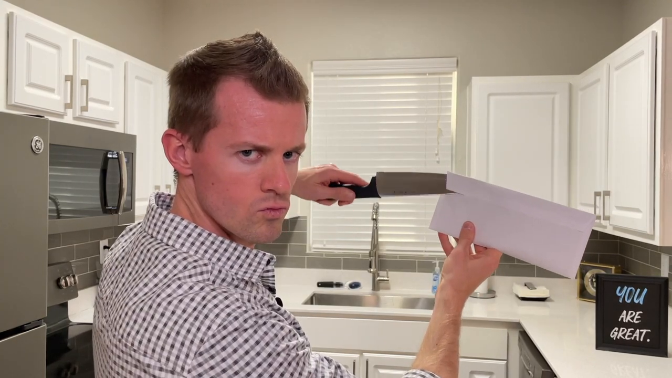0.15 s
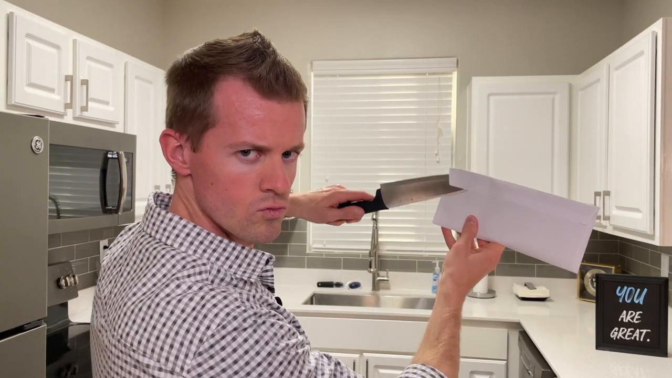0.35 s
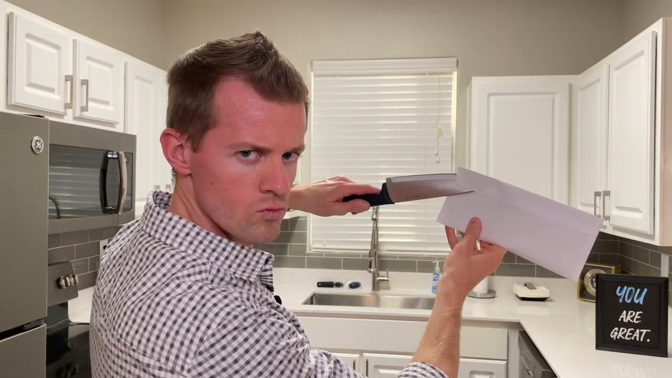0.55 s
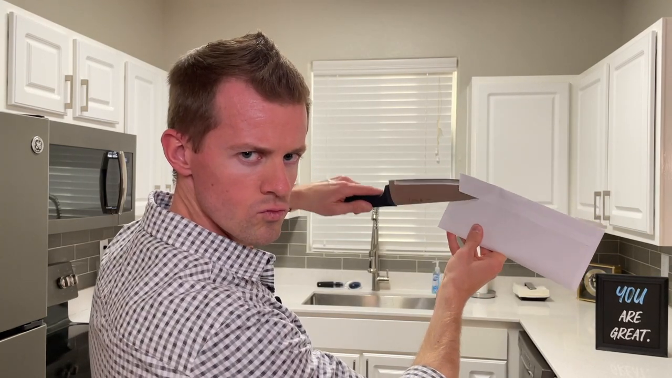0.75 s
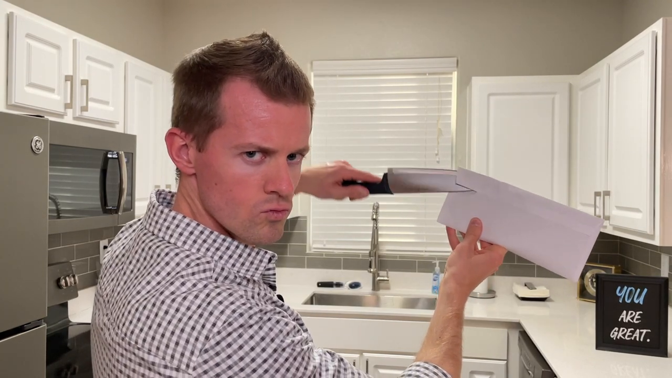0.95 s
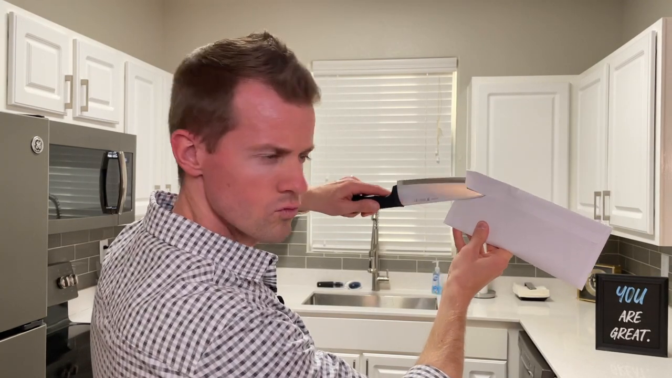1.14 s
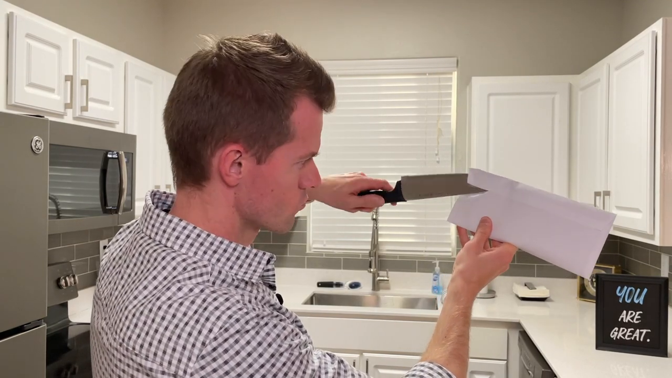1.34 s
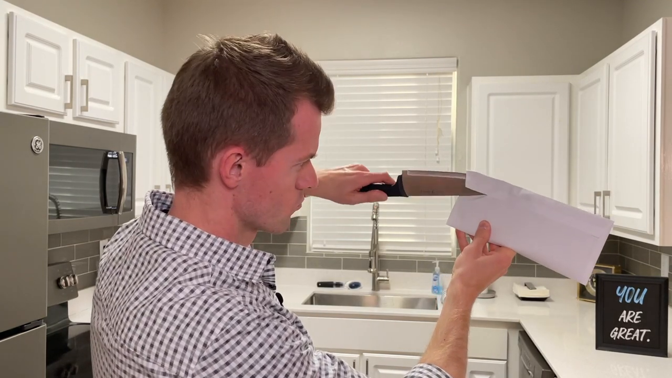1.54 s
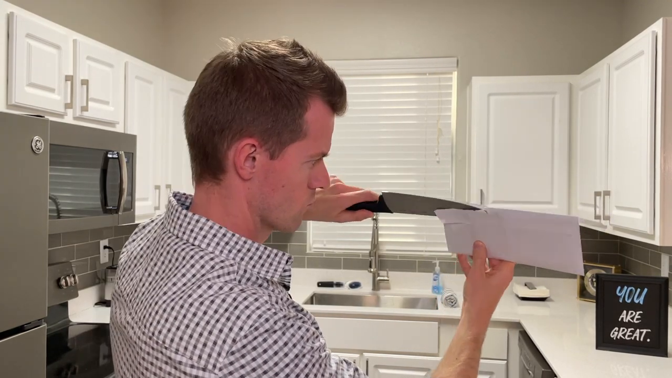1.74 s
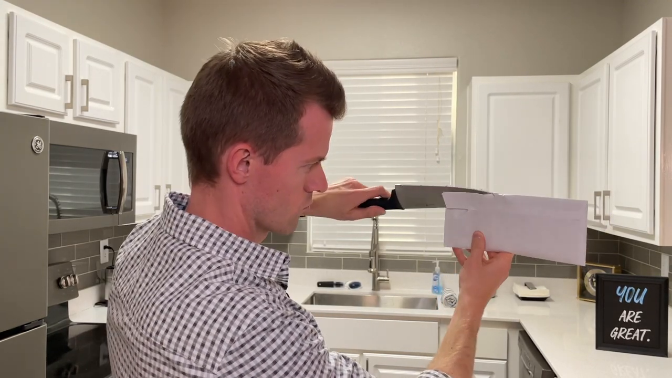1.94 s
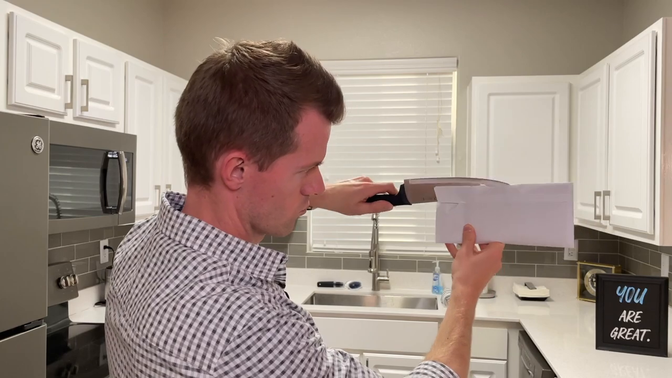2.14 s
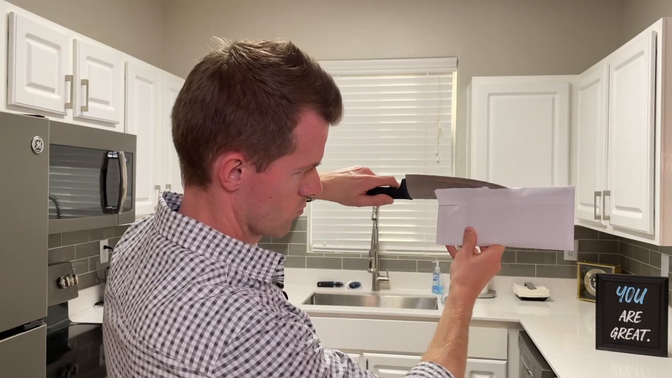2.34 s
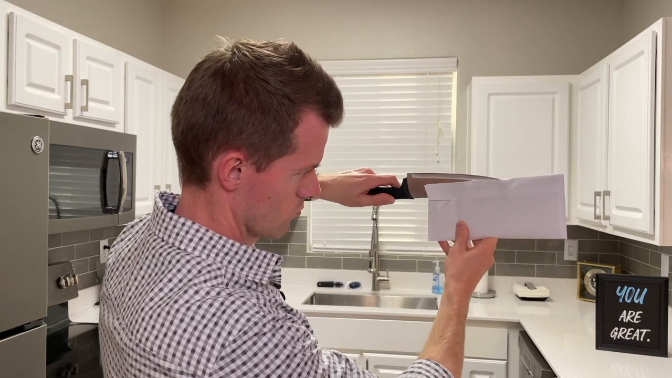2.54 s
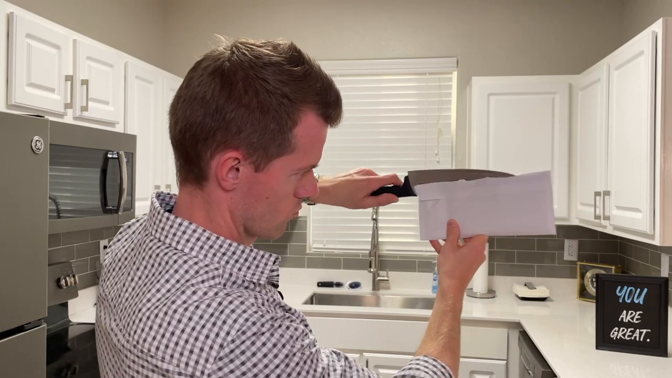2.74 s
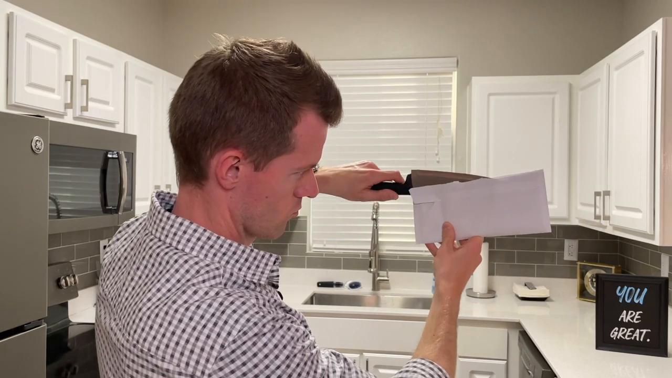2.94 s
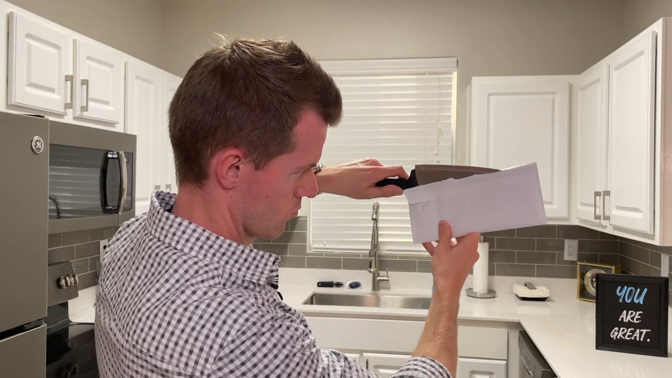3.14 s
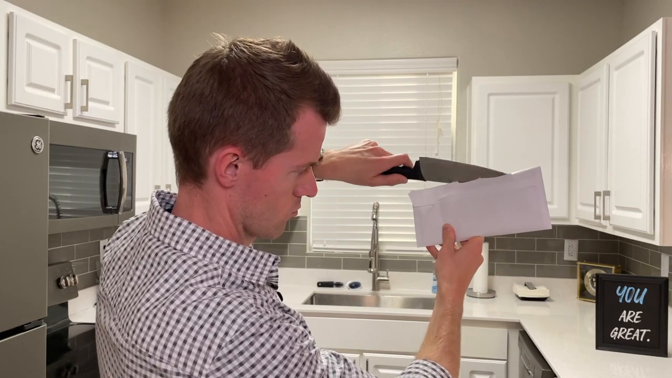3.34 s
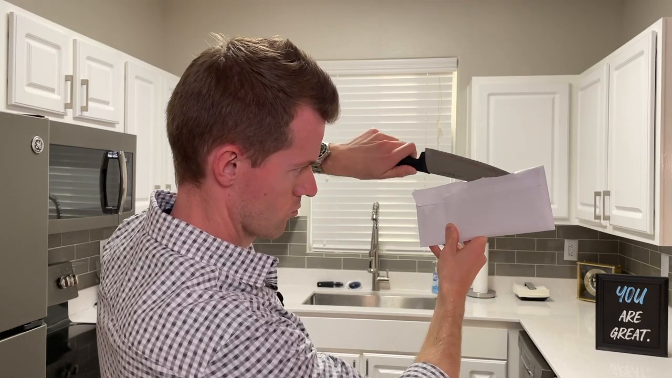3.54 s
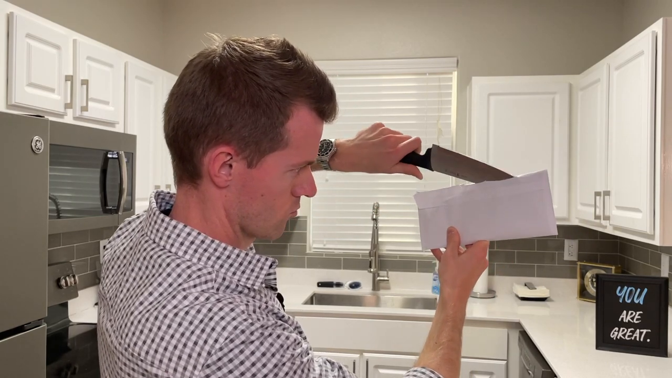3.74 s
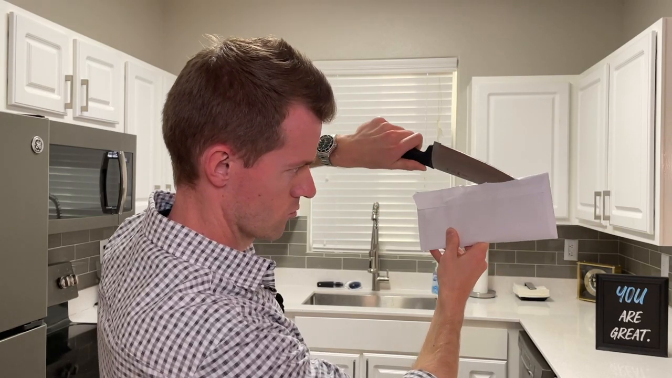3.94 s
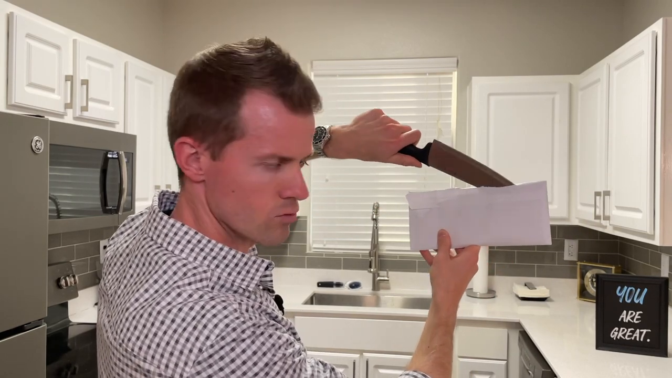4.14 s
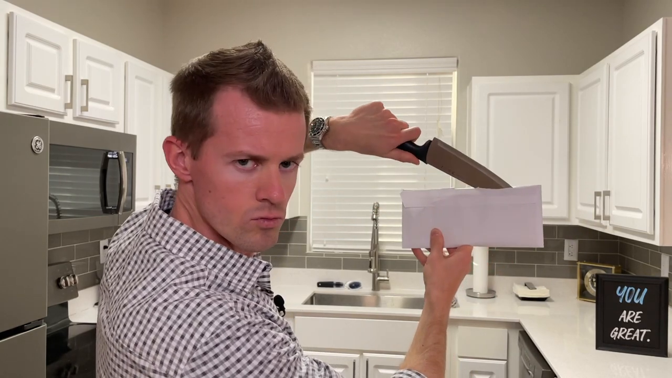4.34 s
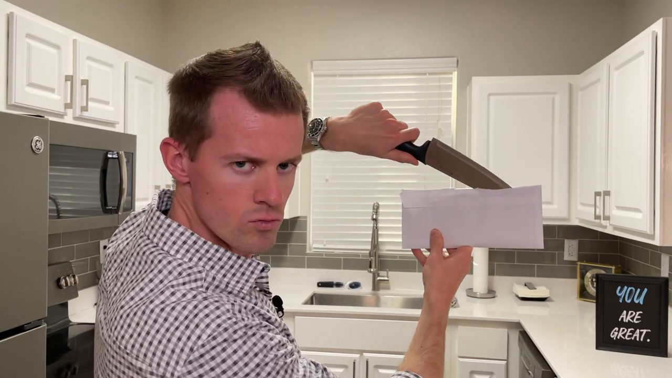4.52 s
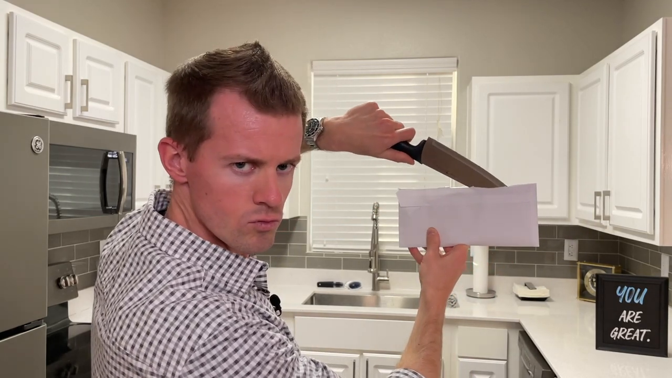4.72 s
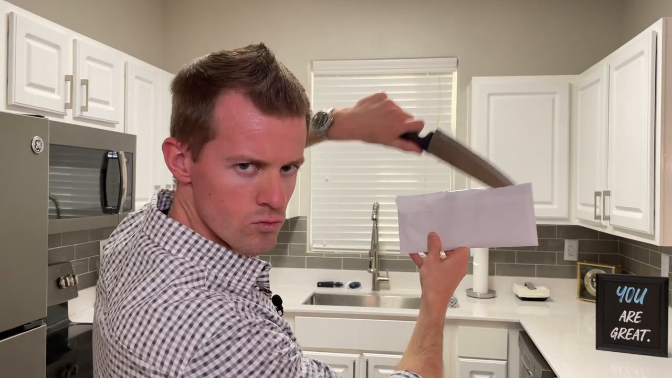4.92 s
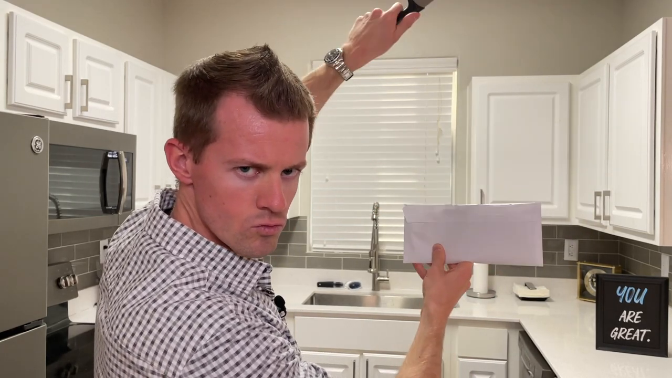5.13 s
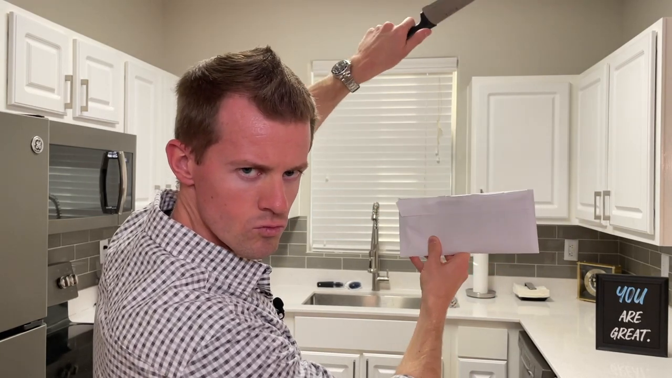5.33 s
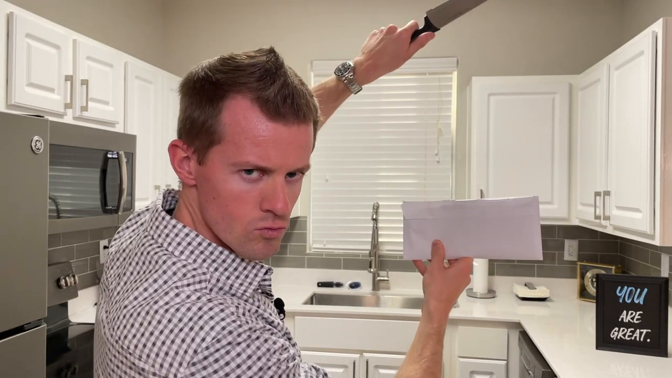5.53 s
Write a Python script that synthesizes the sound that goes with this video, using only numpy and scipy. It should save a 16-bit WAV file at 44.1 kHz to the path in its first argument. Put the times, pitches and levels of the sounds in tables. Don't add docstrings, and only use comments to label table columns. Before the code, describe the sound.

A close mono pickup in a hard-walled kitchen. From 0 to 1.3 s a knife blade feels along a paper envelope: light, irregular scratches, crisp ticks and small hollow paper knocks, with stronger snaps around 0.4 and 1.0 s. From about 1.35 to 1.8 s the sawing gets hard, with dense bright crackling and sharp crease snaps. More grainy tearing strokes come around 2.1 s, a lighter scrape near 2.45 s, and another crackling burst at 2.65-2.75 s. A short rasp at 3.0 s and a clear snap at 3.34 s follow, then only faint ticks near 3.7 and 4.25 s. Quiet room tone, distant fridge hum and soft low air rumble remain. At about 4.95 s one fast, loud rip cracks out with a tiny rising whoop and a brief room tail, low air movement after it, and a last small tick at 5.32 s.

```python
import sys
import numpy as np
from scipy import signal
from scipy.fft import rfft, irfft
from scipy.io import wavfile
from scipy.ndimage import uniform_filter1d

SR = 44100
rng = np.random.default_rng(int(sys.argv[2]) if len(sys.argv) > 2 else 0)


def nominal_scale(level):
    x = np.asarray(level, float) / 20
    return 10 ** x


def pcm_store(signal):
    levels = np.round(np.clip(np.atleast_2d(signal), -1, 1) * 32767)
    wavfile.write(sys.argv[1], SR, levels.astype(np.int16).T)


N = 250399


def tearing():
    # (time
    # of full force [s], rise [s], fall [s], force [dB], keenness of the edge above it [dB])
    strokes = [(0.0, .01, 0.11, -56.5, 4.5), (0.048, 0.045, 0.085, -50.5, -12),
               (0.139, 0.035, 0.082, -51.5, 3.5), (0.238, 0.044, .003, -59, 7.5),
               (0.337, 0.085, 0.071, -47.5, -1), (0.424, 0.015, 0.044, -47.5, 5.5),
               (0.5, 0.3, 0.14, -53.5, -7), (0.654, 0.09, 0.062, -46.5, -14), (0.744, 0.033, 0.11, -50, -3),
               (0.85, 0.081, 0.034, -56.5, 5), (0.9, 0.031, .008, -46, -8), (0.92, 0.041, 0.032, -64, -7),
               (0.951, 0.02, 0.038, -51.5, 5.5), (1.016, 0.073, 0.059, -40.5, -3.5),
               (1.05, 0.03, 0.13, -49, -20), (1.231, 0.078, .05, -53.5, -0.5), (1.29, 0.054, 0.064, -65, 2),
               (1.368, 0.037, 0.031, -47, 5.5), (1.476, 0.098, 0.044, -38.5, -10),
              (1.518, 0.13, 0.092, -49, 0), (1.61, 0.033, 0.21, -39, -3),
              (1.766, 0.02, 0.0094, -33.5, -6.5), (1.785, 0.0096, 0.0083, -53.5, 3),
              (1.841, 0.0059, 0.023, -45, 7.5), (1.871, 0.022, 0.008, -46, 6),
              (1.915, 0.037, 0.064, -49, -4), (2.053, 0.082, 0.023, -54.5, 2),
              (2.07, 0.0078, 0.075, -36.5, 4.5), (2.146, 0.065, 0.058, -34, 3.5),
              (2.212, 0.14, 0.16, -47, -13.5), (2.343, 0.033, 0.038, -52, -3.5),
              (2.416, 0.045, 0.015, -54.5, -2), (2.458, 0.045, 0.06, -44, 12.5),
              (2.5, 0.027, 0.06, -42, -2), (2.56, 0.087, 0.52, -63, -6.5), (2.64, .005, .015, -52, -0.5),
              (2.663, 0.008, 0.041, -34, -3), (2.743, 0.096, 0.11, -32, -1.5), (2.91, 0.09, 0.053, -52, 12),
              (3.011, 0.056, 0.012, -33, 2), (3.021, 0.022, 0.062, -48, -3),
               (3.1, 0.06, 0.11, -57.5, -5), (3.21, 0.031, 0.041, -51, 1), (3.27, 0.038, 0.17, -65, 11.5),
                (3.346, 0.029, 0.042, -44, -2), (3.388, 0.017, 0.12, -56.5, -7),
                (3.58, 0.16, 0.11, -68.5, 0), (3.685, 0.022, 0.022, -47.5, 7.5),
                (3.7, 0.023, 0.077, -61.5, 0.5), (3.8, 0.066, 0.26, -80, 0.5), (4.17, .21, 0.18, -75, 4),
                (4.25, 0.029, 0.029, -55, 0), (4.28, 0.024, 0.17, -74, -1.5)]
    # (time [s], force [dB], sheet flapping free above it [dB])
    rip = [
        (4.869, -78, -7),
        (4.898, -59, -5),
        (4.903, -44, -10),
        (4.931, -38, -4),
        (4.952, -27.5, -6.5),
        (4.958, -16, -12),
        (4.962, -35.5, -3),
        (4.991, -49.5, 1.5),
        (5.08, -76, 14),
    ]
    # (frequency [Hz], level per Hz [dB])
    fold_spectrum = [(1650, -45.5), (2800, -36), (3460, -29), (4090, -3), (4820, 9.5), (6000, 10.5),
                     (7050, 6.5), (8100, 7.5), (9180, -5), (10000, -4.5), (13000, -25), (22000, -120)]
    sheet_spectrum = [(180, -21.5), (300, -10.5), (839, -4.5), (988, -5.5), (2880, -7), (3500, -5.5),
                      (4550, -20), (7700, -120)]
    edge_spectrum = [(5290, -18), (9000, -16), (11100, -6.5), (15100, -24), (16300, -21), (16400, -29.5),
                     (16500, -54.5)]
    rounding, stroke_power = 0.21, 1.3
    sheet_db, sheet_follows, middle_force_db = -49.5, 0.72, -44.5
    rip_keen_db, rip_keen_most_db = -0.5, -26

    t = np.arange(N) / SR
    grains = fibres(per_s=1500, spread_db=-0.5, smooth=1.6, clump_db=1.5)
    grains = patchy(grains, count=22, wander_db=1.5, per_s=40)
    fold, sheet, edge = np.zeros((3, N))
    for s, rise, fall, force_db, keen_db in strokes:
        ramp = swell(s, rise, fall)
        on = np.flatnonzero(ramp)
        shape = ramp[on] * (1 + rounding * (1 - ramp[on]))
        stroke = shape ** stroke_power
        fold[on] += nominal_scale(force_db) * stroke
        edge[on] += nominal_scale(force_db + keen_db) * stroke
        sheet[on] += nominal_scale(sheet_db + sheet_follows * (force_db - middle_force_db)) * shape

    s, force_db, free_db = np.transpose(rip)
    rip_edge_db = np.minimum(force_db + rip_keen_db, rip_keen_most_db)
    fold += np.interp(t, s, nominal_scale(force_db), left=0, right=0)
    sheet += np.interp(t, s, nominal_scale(force_db + free_db), left=0, right=0)
    edge += np.interp(t, s, nominal_scale(rip_edge_db), left=0, right=0)

    torn_fold = fold * coloured(grains, fold_spectrum)
    rustle = sheet * coloured(grains, sheet_spectrum)
    edge_hiss = edge * coloured(grains, edge_spectrum)
    return torn_fold + rustle + edge_hiss + singing(grains)


def fibres(per_s, spread_db, smooth, clump_db):
    sizes = nominal_scale(spread_db * np.minimum(rng.exponential(1, N), 4)) * rng.standard_normal(N)
    breaks = rms_one(sizes * (rng.random(N) < per_s / SR))
    rub = smooth * rng.standard_normal(N)
    return (breaks + rub) * nominal_scale(clump_db * drift(220))


def patchy(grains, count, wander_db, per_s):
    out = np.zeros(N)
    for k, hz in enumerate(np.geomspace(200, 15500, count)):
        out += (-1) ** k * ringing(grains, hz, 0.18 * hz) * nominal_scale(wander_db * drift(per_s))
    return out


def singing(grains):
    # (time of the top [s], rise [s], fall [s], level [dB], pitch [Hz])
    slit = [(1.0, .05, .035, -48, 6000), (1.645, .03, .02, -42, 8100), (1.842, .008, 0.028, -45.5, 1980),
            (2.108, .008, 0.022, -38, 4960), (2.135, .012, 0.028, -30.5, 8000),
            (2.16, .02, 0.021, -39, 10900), (2.745, .025, .03, -47, 6000), (3.02, .01, 0.076, -51.5, 2100),
            (3.212, .015, 0.02, -46, 4600), (3.345, .006, 0.14, -58, 2530), (3.345, .006, 0.14, -57, 690),
            (3.562, .012, 0.026, -61, 2800), (3.684, .018, 0.011, -36, 4420),
            (3.686, .015, 0.014, -47, 3200), (3.688, .012, 0.013, -55, 1030),
            (4.913, .008, 0.03, -38.5, 4370), (4.969, .008, 0.075, -45.5, 1750),
            (4.932, 0.031, 0.024, -39, 9600), (5.33, 0.0048, 0.13, -65, 1910),
            (2.48, 0.072, .05, -49.5, 3300), (3.013, .015, 0.01, -42.5, 1780), (0.33, .06, .03, -48, 5900)]
    out = np.zeros(N)
    for s, rise, fall, db, hz in slit:
        ramp = swell(s, rise, fall)
        on = np.flatnonzero(ramp)
        once = ringing(grains[on], hz, .2 * hz)
        twice = ringing(once, hz, .4 * hz)
        out[on] += nominal_scale(db) * ramp[on] * rms_one(twice)
    return out


def snaps():
    # (time [s], peak [dB], pitch [Hz], dull knock above it [dB])
    light_snaps = [(0.006, -31.5, 6840, -12), (0.0245, -21.5, 6200, -10), (0.0723, -35, 5400, -12),
                   (0.2559, -29.5, 6900, -19), (0.3499, -21.5, 6500, -8), (0.3973, -30, 5600, 0.5),
                   (0.4164, -15, 5900, -11), (0.4944, -24, 3930, -9), (0.5383, -24, 5900, -9),
                   (0.6834, -35, 5900, -2), (0.7473, -32, 5500, -12), (0.7825, -21, 7500, -9),
                   (0.8223, -25.5, 4470, -14), (0.8356, -26, 6100, -20), (0.8702, -20.5, 5660, -7.5),
                   (0.8795, -32, 4600, -5), (0.9515, -41, 5700, -27), (0.9672, -23, 5270, -13),
                   (1.0283, -16, 4550, -11), (1.0346, -19.5, 6370, -8), (1.1783, -37, 7740, -15),
                   (1.2316, -28.5, 5800, -16)]
    saw_snaps = [(1.3713, -29, 5610, -13), (1.4034, -22, 8520, -13.5), (1.4189, -11.5, 6100, -12),
                 (1.4427, -24.5, 7980, -11.5), (1.448, -19.5, 5460, -5.5), (1.453, -22.5, 5700, -18),
                 (1.4684, -7, 5700, -11.5), (1.4924, -17.5, 7300, -13.5), (1.586, -27, 5500, -11.5),
                 (1.601, -19, 8400, -17.5), (1.6142, -20, 8040, -20), (1.6197, -16.5, 8400, -16.5),
                 (1.6561, -20, 9000, -9), (1.6712, -9.5, 6100, -13), (1.6953, -20.5, 5800, -19),
                 (1.7271, -32.5, 5620, -19), (1.749, -10, 8630, -10), (1.769, -12.5, 5300, -24),
                 (1.7738, -17, 8200, -21), (1.911, -26, 8400, -13.5), (2.0663, -23, 6500, -30.5),
                 (2.1004, -12.5, 6040, -36), (2.231, -24.5, 7200, -5.5), (2.637, -38.5, 7970, -8),
                 (2.6595, -15, 5580, -18.5), (2.6713, -19.5, 4460, -15), (2.6772, -15, 4740, -18.5),
                 (2.6798, -10.5, 6960, -27), (2.7105, -14, 3600, -11.5), (2.7157, -11.5, 4650, -16)]
    late_snaps = [(3.1653, -31.5, 3580, -4), (3.259, -36, 4610, -29), (3.2703, -31.5, 9050, -37),
                  (3.3116, -36, 9100, -22), (3.3218, -20.5, 4330, -31), (3.3365, -13, 5130, -5.5),
                  (3.555, -43, 6030, -22), (3.5628, -31.5, 11500, -37), (3.5912, -44, 11500, -21),
                  (3.6233, -52, 5300, -17), (3.6395, -48, 5500, -18), (3.658, -41, 5030, -12),
                  (3.6904, -29, 4700, -23), (3.842, -53.5, 5170, -13), (4.1579, -52.5, 4600, -12.5),
                  (4.2277, -38, 4540, -28), (4.2453, -29, 4600, -31), (4.2499, -33, 6300, -20.5),
                  (4.873, -52, 4334, -20), (4.8845, -44, 4670, -19), (4.9534, -8.5, 4300, -2.5),
                  (4.9576, -10.5, 8200, -26), (4.9595, -6.5, 5400, -12.5), (5.3228, -21, 7880, -13),
                  (5.3292, -40.5, 5760, -12), (5.3441, -40.5, 4360, 1.5)]
    more_snaps = [(0.4225, -43, 6300, -10), (0.4255, -27, 8000, -19), (0.431, -37, 5500, -1),
                  (0.5005, -37, 2900, 3), (0.506, -48, 6000, -7), (0.546, -36, 4000, -2),
                  (0.5545, -43, 6000, -1), (1.4255, -27, 8500, -8), (1.4357, -25, 8000, -5),
                  (1.4605, -27, 5300, -3), (1.4757, -24, 4500, -8), (1.4825, -33, 2800, 5),
                  (3.329, -39.5, 3440, -12), (4.9015, -30, 7770, -13.5), (4.9062, -31, 4310, -21.5),
                  (4.9115, -25.5, 4240, -20), (4.917, -26.5, 4700, -20.5), (4.9367, -16.5, 9170, -13),
                  (4.9481, -15, 9750, -13.5), (0.8275, -33, 9000, -20), (0.8385, -46, 7000, -20),
                  (0.848, -35, 6000, -20), (0.858, -34, 7000, -20), (0.885, -44, 6000, -20),
                  (0.892, -46, 6000, -20), (0.9015, -45, 6000, -20), (0.945, -35, 7000, -18),
                  (1.0328, -18, 5500, -18), (1.0362, -18.5, 6500, -7.5), (1.595, -27, 8000, -15),
                  (1.6055, -26.5, 6000, -20), (1.6315, -28.5, 8500, -15), (1.6445, -37, 6000, -18),
                  (1.6635, -20, 3300, -8), (1.7665, -19, 6000, -20), (2.088, -18.5, 8500, -28),
                  (2.1035, -16.5, 6000, -9.5), (2.1265, -17.5, 8000, -18), (2.1435, -20.5, 8000, -18),
                  (2.1935, -30, 6500, -1), (2.666, -21.5, 4700, -14), (2.681, -12, 8000, -19),
                  (2.6832, -18, 5500, -15), (3.272, -39, 3300, -24), (3.522, -49.5, 2500, 1),
                  (0.218, -39, 7500, -20), (0.24, -36, 7500, -16), (2.273, -40, 2500, 2),
                  (2.285, -36, 7000, -20)]
    groups = [(light_snaps, .45), (saw_snaps, 1.0), (late_snaps, .55), (more_snaps, .55)]
    repeat_s, repeat_db = 0.0013, -10

    size = 500
    t = np.arange(size) / SR
    rows = [(*row, ms) for group, ms in groups for row in group]
    noise = rng.standard_normal((len(rows), size))
    out = np.zeros(N + size)
    for (s, peak_db, hz, dull_db, ms), n in zip(rows, noise):
        last_ms = ms * (1 + 0.5 * np.tanh(n[-1]))
        thin_db = -14.5 + 2 * np.tanh(n[-2])
        thin_db += 0.39 * (dull_db + 15) + 0.71 * (peak_db + 18.5)

        after = np.maximum(t - .0008 * last_ms, 0)
        decay = np.exp(-after / .00035) + .14 * np.exp(-after / .002)
        burst = n * np.minimum(t / .0002, 1) * decay
        burst[8] += 4.5

        crack = peak_one(ringing(burst, hz, .2 * hz) + .3 * band(burst, 3000, 9500))
        knock = peak_one(band(burst, 1000, 3300))
        tick = peak_one(ringing(burst, 10700, 2400) + .15 * band(burst, 9500, 14000))
        body = crack + nominal_scale(dull_db) * knock + nominal_scale(thin_db) * tick
        lag = int(repeat_s * (1 + .3 * np.tanh(n[-3])) * SR)
        body[lag:] += nominal_scale(repeat_db) * body[:-lag].copy()
        start = int((s - .0002) * SR)
        out[start:start + size] += nominal_scale(peak_db + 2.5) * body
    return out[:N]


def nicks():
    # (time [s], peak [dB], pitch [Hz])
    nick_events = [(0.4164, -11.5, 11800), (1.4189, -9.5, 10500), (1.448, -22, 9000), (1.453, -17.5, 9500),
                   (1.4684, -12.5, 11500), (1.4745, -25.5, 11000), (1.601, -22, 12500), (1.656, -23, 11500),
                   (1.672, -8.5, 8000), (1.7271, -33, 12800), (1.75, -12, 10000), (1.778, -31, 10000),
                   (2.0668, -27, 8800), (2.2306, -23, 12440), (2.66, -17, 11000), (2.682, -15, 11000),
                   (1.0283, -17.5, 11700), (2.539, -38.5, 12200), (3.265, -41, 11000),
                   (3.277, -37.5, 10500), (3.312, -41, 11500), (3.3215, -26, 11300), (3.329, -40, 11000),
                   (3.3328, -33, 11200), (3.343, -30.5, 10500), (4.9535, -12, 9800)]
    size = 300
    t = np.arange(size) / SR
    noise = rng.standard_normal((len(nick_events), size))
    out = np.zeros(N + size)
    for (s, peak_db, hz), n in zip(nick_events, noise):
        tick = ringing(n * np.exp(-t / 0.00037), hz, 0.094 * hz)
        start = int(s * SR)
        out[start:start + size] += nominal_scale(peak_db) * peak_one(tick)
    return out[:N]


def thuds():
    # (time [s], peak [dB], pitch [Hz])
    knocks = [(0.0238, -44, 1160), (0.0723, -35.5, 577), (0.3974, -34.5, 660), (0.4154, -36, 833),
              (0.5368, -34, 550), (0.553, -38.5, 1245), (0.7524, -41, 592), (0.8702, -30.5, 715),
              (0.967, -36, 500), (1.0269, -49, 1180), (1.1623, -37.5, 514), (1.3697, -33.5, 742),
              (1.4013, -34.5, 1034), (1.4186, -31.5, 617), (1.4388, -31, 350), (1.46, -36, 500),
              (1.468, -25.5, 749), (1.484, -34, 499.5), (1.6097, -31, 1286), (1.6188, -32.5, 964),
              (1.656, -34.5, 463), (1.671, -30.5, 702), (1.748, -42, 1490), (1.768, -29, 1480),
              (2.1014, -40.5, 860), (2.2316, -36.5, 884), (2.657, -29.5, 967), (3.011, -52.5, 1490),
              (3.3367, -26, 586), (3.6896, -54, 1030), (4.2498, -44, 643), (4.9533, -24.5, 1000),
              (5.323, -54, 499), (5.3456, -45, 1450)]
    size = 900
    t = np.arange(size) / SR
    noise = rng.standard_normal((len(knocks), size))
    out = np.zeros(N + size)
    for (s, peak_db, hz), n in zip(knocks, noise):
        push = np.exp(-t / 0.000098) + 0.32 * n * np.exp(-t / 0.0031)
        skin = peak_one(ringing(band(push, 200, 1100), hz, .9 * hz))
        rough = peak_one(band(push, 550, 3100))
        start = int(s * SR)
        out[start:start + size] += nominal_scale(peak_db) * peak_one(skin + 0.34 * rough)
    return out[:N]


def whoop():
    # (time [s], pitch [Hz], level [dB])
    sweep = [
        (4.927, 497, -46),
        (4.943, 958, -28),
        (4.95, 1493, -34.5),
        (4.959, 2020, -28.5),
        (4.963, 1890, -35),
        (4.985, 1750, -50.5),
    ]
    s, hz, db = np.transpose(sweep)
    t = np.arange(N) / SR
    level = nominal_scale(np.interp(t, s, db, left=-200, right=-200)) * (1 + .5 * drift(350))
    phase = 2 * np.pi * np.cumsum(np.interp(t, s, hz)) / SR
    return level * np.sin(phase)


def pocket():
    open_s, hz, width_hz = 4.962, 1290, 760
    start_db, db_per_s = -43, -83
    after = np.arange(N) / SR - open_s
    hollow = ringing(rng.standard_normal(N), hz, width_hz)
    hollow = ringing(hollow, hz, 2 * width_hz)
    return nominal_scale(start_db + db_per_s * np.maximum(after, 0)) * (after > 0) * rms_one(hollow)


def kitchen(x):
    # (frequency [Hz], time to fall 60 dB [s], tail level [dB])
    walls = [(200, .7, -17), (800, 0.5, -13), (1600, .65, -14), (3200, 0.55, -16), (6560, 0.43, -21),
             (13000, 0.32, -22)]
    where_hz, t60, tail_db = np.transpose(walls)
    octaves = 200 * 2. ** np.arange(7)
    noise = rng.standard_normal((len(octaves), N))
    out = np.zeros(N)
    gap = int(.004 * SR)
    for hz, n in zip(octaves, noise):
        edges = hz / 2 ** .5, hz * 2 ** .5
        keep = nominal_scale(-120 / (np.interp(hz, where_hz, t60) * SR))
        sent = uniform_filter1d(band(x, *edges) ** 2, gap, origin=gap // 2 - 1)
        energy = signal.lfilter([1 - keep], [1, -keep], sent)
        level = nominal_scale(np.interp(hz, where_hz, tail_db)) * np.sqrt(np.abs(energy))
        out[gap:] += (level * rms_one(band(n, *edges)))[:-gap]
    return out


def air():
    # (time [s], level [dB])
    arms = [(0.0, -61), (0.3, -56.5), (1.2, -51.5), (1.74, -49), (1.95, -58), (2.17, -48), (2.7, -52),
            (2.86, -43), (3.1, -37), (3.35, -38.5), (3.9, -56), (4.2, -48.5), (4.8, -58), (4.931, -49),
            (5.2, -54), (5.35, -60), (5.68, -51.5)]
    # (time [s], half length [s], level [dB])
    sleeves = [(0.14, 0.26, -63), (0.895, 0.74, -61), (1.455, 0.077, -46), (1.675, 0.21, -65.5),
               (2.19, 0.33, -62), (2.553, 0.18, -60), (3.206, 0.67, -75.5), (3.844, 0.15, -72),
               (4.194, 0.29, -66), (4.95, 0.056, -47.5), (5.12, 0.091, -59.5)]
    # (time [s], half length [s], level [dB])
    swings = [
        (0.306, 1, -34),
        (1.449, 0.28, -38.5),
        (2.858, 0.096, -31),
        (5.069, 0.18, -22),
    ]
    sway_db, flutter_db, sleeve_rest_db = 7.5, 0, -70

    push = nominal_scale(np.interp(np.arange(N) / SR, *np.transpose(arms)))
    sway = coloured(rng.standard_normal(N), [(4, -2.0), (9, -9.0), (18, -22.5)])
    flutter = coloured(rng.standard_normal(N), [(20, 6.0), (45, -10.0), (90, -22.5)])
    cloth = coloured(rng.standard_normal(N), [(110, 2), (330, -2)]) * nominal_scale(3.5 * drift(25) - 3)
    shifting = nominal_scale(sleeve_rest_db) + sum(nominal_scale(db) * swell(s, half, half) for s, half, db in sleeves)
    swing = sum(nominal_scale(db) * swell(s, half, half) for s, half, db in swings)
    return (nominal_scale(sway_db) * push + swing) * sway + nominal_scale(flutter_db) * push * flutter + shifting * cloth


def background():
    # (frequency [Hz], level per Hz [dB])
    room_tone = [(41, -47.5), (70, -15), (124, 0.5), (145, -1), (276, -19), (355, -16.5), (389, -11.5),
                 (628, -11.5), (865, -19), (1340, -26), (16500, -32.5)]
    # (frequency [Hz], level [dB])
    motor = [(118.4, -78), (355.3, -89), (441.4, -78.5), (619.1, -77.5)]
    t = np.arange(N) / SR
    hum = np.zeros(N)
    for hz, db in motor:
        hum += nominal_scale(db + 0.97 * drift(3.6)) * np.sin(2 * np.pi * hz * t)
    return nominal_scale(-71.5) * coloured(rng.standard_normal(N), room_tone) + hum


def rms_one(x):
    return x / np.sqrt(np.mean(x ** 2) + 1e-20)


def peak_one(x):
    return x / np.abs(x).max()


def coloured(x, spectrum):
    hz = np.maximum(np.fft.rfftfreq(len(x), 1 / SR), 1)
    point_hz, point_db = np.transpose(spectrum)
    db = np.interp(np.log(hz), np.log(point_hz), point_db)
    octaves_below = np.maximum(np.log2(point_hz[0] / hz), 0)
    octaves_above = np.maximum(np.log2(hz / point_hz[-1]), 0)
    return rms_one(irfft(rfft(x) * nominal_scale(db - 14.3 * (octaves_below + octaves_above)), len(x)))


def band(x, low_hz, high_hz):
    return signal.sosfilt(signal.butter(2, [low_hz, high_hz], "band", fs=SR, output="sos"), x)


def ringing(x, hz, width_hz):
    r = np.exp(-np.pi * width_hz / SR)
    poles = [1, -2 * r * np.cos(2 * np.pi * hz / SR), r * r]
    return signal.lfilter([(1 - r * r) / 2, 0, (r * r - 1) / 2], poles, x)


def drift(rate):
    knots = rng.standard_normal(int(N / SR * 400) + 2)
    return rms_one(np.interp(np.arange(N) / SR * rate, np.arange(len(knots)), knots))


def swell(s, rise, fall):
    out = np.zeros(N)
    on = np.arange(max(int((s - rise) * SR), 0), min(int((s + fall) * SR), N))
    out[on] = np.interp(on / SR, [s - rise, s, s + fall], [0, 1, 0])
    return out


def scene():
    paper = tearing() + snaps() + nicks() + thuds() + whoop()
    mono = paper + kitchen(paper) + air() + background() + pocket()
    return np.array([mono, mono])


def roll_off(x):
    return signal.sosfilt(signal.butter(12, 17020, fs=SR, output="sos"), x)


def record(dry):
    held = dry / (1 + (dry / .6) ** 4) ** .25
    top_cut = signal.cheby2(10, 40, 16200, fs=SR, output="sos")
    return roll_off(signal.sosfilt(top_cut, held))


dry = scene()
out = record(dry)
pcm_store(out)
```